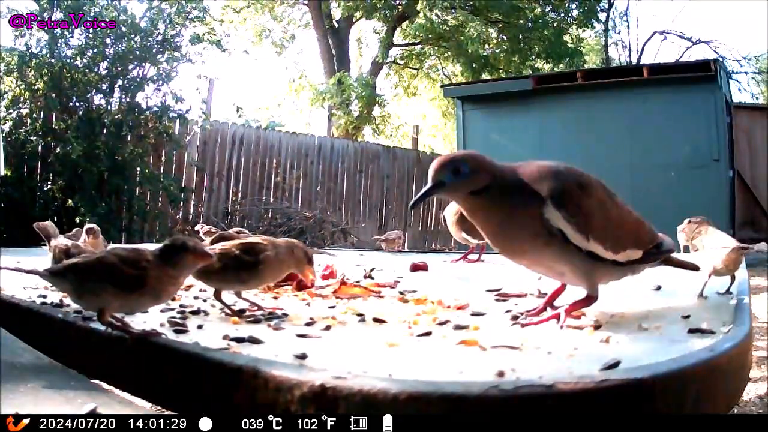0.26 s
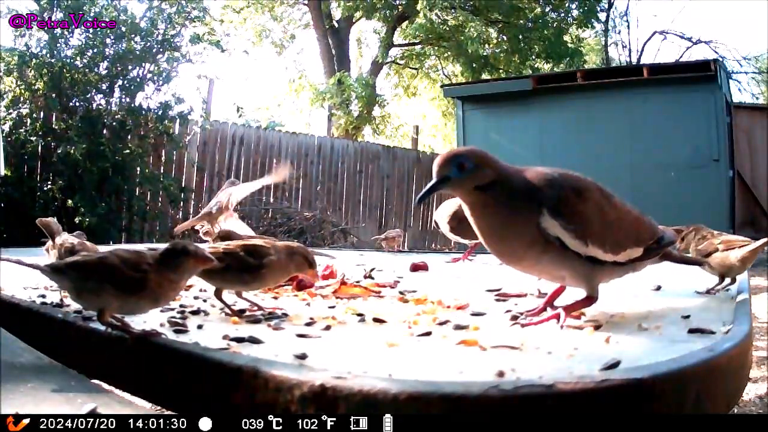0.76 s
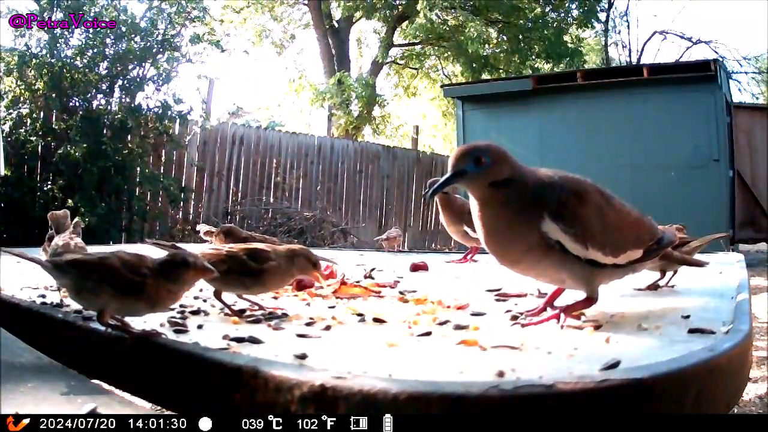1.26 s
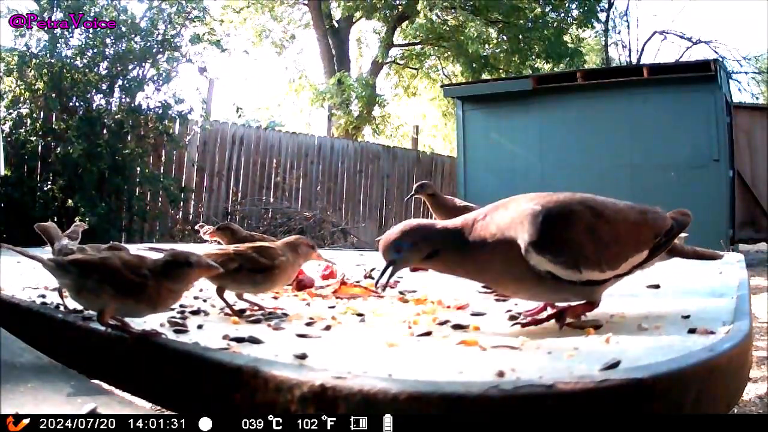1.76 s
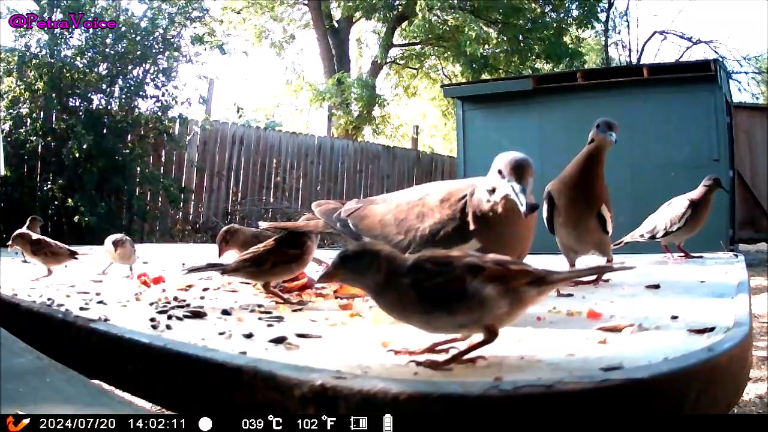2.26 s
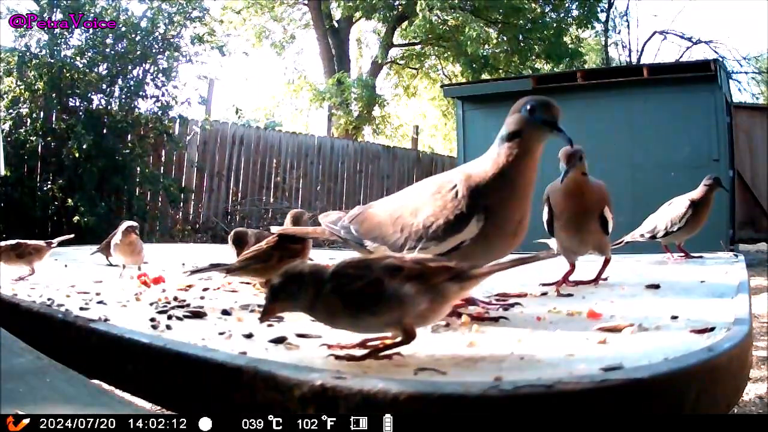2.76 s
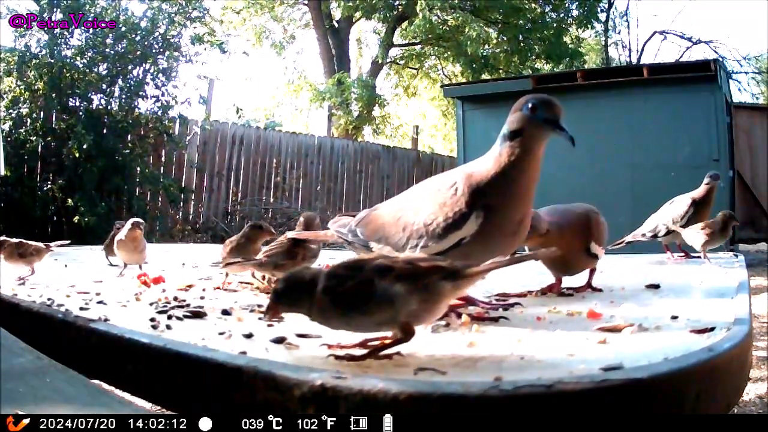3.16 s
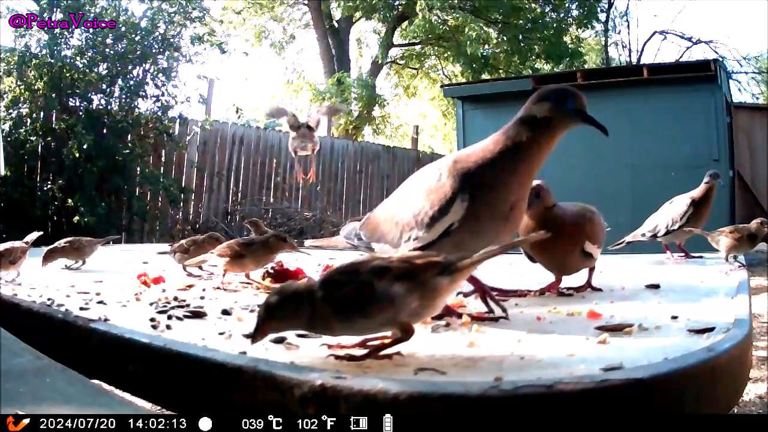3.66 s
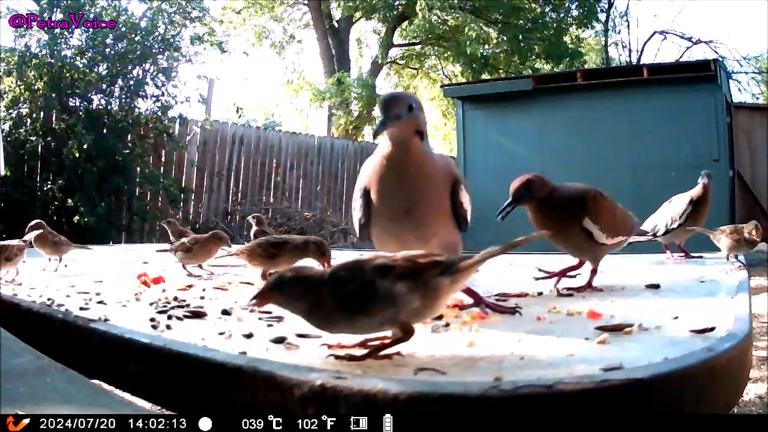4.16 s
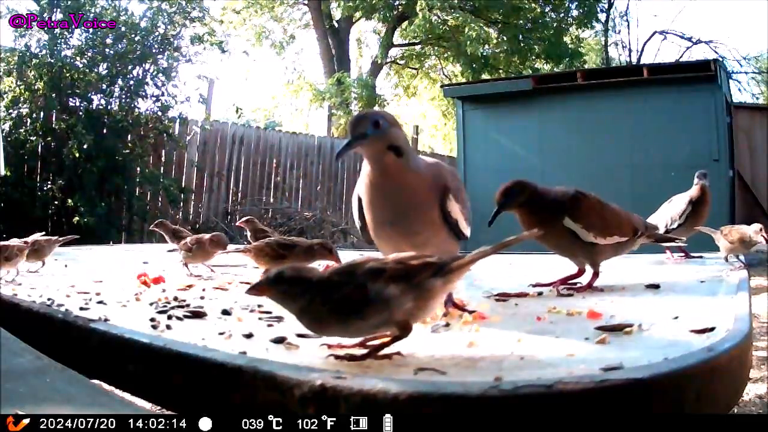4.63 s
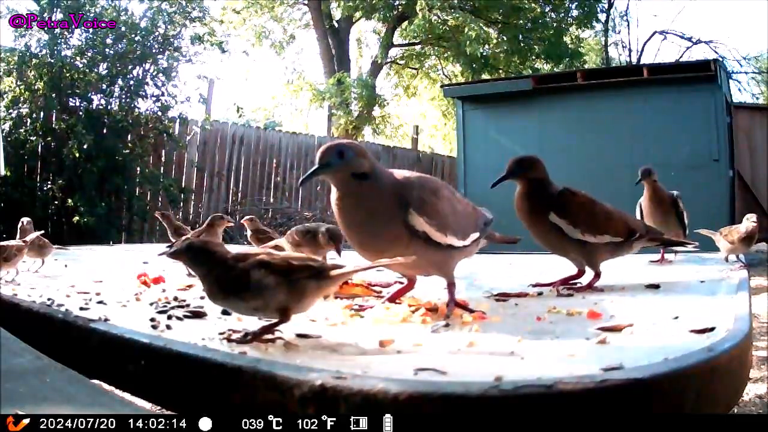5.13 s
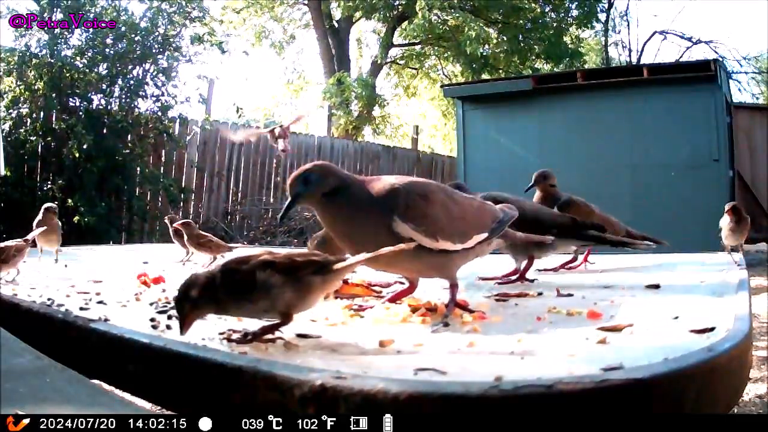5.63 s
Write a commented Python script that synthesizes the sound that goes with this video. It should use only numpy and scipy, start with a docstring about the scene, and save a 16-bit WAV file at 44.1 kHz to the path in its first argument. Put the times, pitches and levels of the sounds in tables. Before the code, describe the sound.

Close to a small outdoor microphone, birds peck seed on a hard tray: a quick cluster of bright clicks first, then scattered taps and two ringing knocks. Midway, a songbird farther off alternates short rising and falling whistles, joined by a brief hoarse chirp. Dry husk snaps follow. Insect buzz, low drone and distant air continue throughout, in thin narrow sound.

```python
"""Sparrows and doves peck seed on a feeder tray close to a small trail camera: noisy blows ring damped modes.
Husks snap as short rings without the tray; raking claws or fluttering wings are runs of tiny blows.
A songbird farther off alternates rising and falling gliding tones; sparrow chirps and a faint high tap
are rough short glides. Behind lie filtered-noise air, insect buzz, drone and traffic, a far motor's orders
and the camera's hum."""
import sys
import numpy as np
from scipy import signal
from scipy.fft import rfft, irfft
from scipy.io import wavfile
from scipy.ndimage import uniform_filter1d

SR = 44100
rng = np.random.default_rng(int(sys.argv[2]) if len(sys.argv) > 2 else 0)


def waveform_to_disk(signal):
    """Save audio, clipped to [-1, 1], as 16-bit WAV at the path in sys.argv[1]."""
    frames = np.transpose(np.atleast_2d(signal))
    scaled = np.clip(frames, -1, 1) * 32767
    samples = np.round(scaled).astype(np.int16)
    wavfile.write(sys.argv[1], SR, samples)


N = 259749
T = np.arange(N) / SR


def amp(db):
    """Decibels to gain."""
    return 10 ** (np.asarray(db) / 20)


def unit(x):
    """Scales to rms 1."""
    return x / np.sqrt(np.mean(x ** 2) + 1e-20)


def peaked(x, size=88):
    """Scales a blow so that its loudest 2 ms (size, in samples) have rms 1."""
    return x / np.sqrt(uniform_filter1d(x ** 2, size).max())


def curve(rows):
    """Interpolates (time, level) rows to every sample."""
    return np.interp(T, *np.transpose(rows))


def add(mix, start_s, sound):
    """Mixes a sound into mix, in place."""
    part = mix[max(round(start_s * SR), 0):][:len(sound)]
    part += sound[:len(part)]


def highpass(x, hz=1900):
    """Thins the bass, which tiny sources hardly radiate."""
    return signal.sosfilt(signal.butter(4, hz, "high", fs=SR, output="sos"), x)


def lowpass(x, hz):
    """Keeps what lies below hz."""
    return signal.sosfilt(signal.butter(4, hz, "low", fs=SR, output="sos"), x)


def noise(spectrum, size=N):
    """Steady noise of rms 1, its spectrum interpolated over log frequency."""
    point_hz, point_db = np.transpose(spectrum)
    f = np.fft.rfftfreq(size, 1 / SR)
    gain = amp(np.interp(np.log(f + 1), np.log(point_hz + 1), point_db))
    return unit(irfft(rfft(rng.standard_normal(size)) * gain, size))


def drift(rate_hz):
    """Random motion of rms 1, slower than about rate_hz."""
    f = np.fft.rfftfreq(N, 1 / SR)
    gain = np.exp(-(f / rate_hz) ** 2) * (f > 0)
    return unit(irfft(rfft(rng.standard_normal(N)) * gain, N))


def ring(modes, t, scatter, tilt_db=0):
    """Decaying modes; each contact point shifts and weights them a little differently."""
    out = np.zeros(len(t))
    for hz, db, t60_s in modes:
        shift, weight_db = rng.standard_normal(2)
        level_db = db + weight_db + tilt_db * np.log2(hz / 3300) - 60 * t / t60_s
        out += amp(level_db) * np.sin(2 * np.pi * hz * (1 + scatter * shift) * t)
    return out


def echoes(x, t60_s, wet_db):
    """Adds sparse random reflections that decay exponentially after the first 6 ms."""
    t = np.arange(SR) / SR
    taps = rng.standard_normal(SR) * (rng.random(SR) < 3000 / SR)
    taps *= amp(-60 * t / t60_s) * (t > .006)
    return x + amp(wet_db) * signal.fftconvolve(x, taps / np.linalg.norm(taps))[:N]


# short ring of every sharp contact at the microphone: nominal_hz, relative_db, t60_s
CLICK_MODES = [(2920, -4.5, 0.0012), (3336, 11.5, 0.0052), (3840, -7, 0.0024), (4370, -11, 0.0032),
               (5330, -10.5, 0.0079), (6450, -5.5, 0.0053)]
# quickly damped tray resonances under the beak: nominal_hz, relative_db, t60_s
CRACK_MODES = [(2360, -11, 0.023), (3247, 2.5, 0.014), (4455, -3.5, 0.0096), (5800, -2.5, .011),
               (7120, -0.5, 0.014)]
# longer tray modes: nominal_hz, relative_db, t60_s
TRAY_MODES = [(1087, -20, .2), (2082, -5, .11), (2232, -10, .1), (2354, -9, .09), (2470, -11, .11),
              (2574, -4, .09), (3010, -5, .09), (3169, -1, .06), (3360, 0, .07), (3466, -3, .06),
              (4453, -9, .05), (4640, -10, .07), (5760, -8, .06), (6650, -13, .07), (7095, -6, .07),
              (7210, -6, .06)]
# the tray's dense small modes together: frequency_hz, relative_db_per_hz
TRAY_WASH = [(500, -56), (1100, -16), (1780, -29.5), (2080, -10.5), (2540, 1.5), (2700, -11.5),
             (2900, -10.5), (3080, 4.5), (3420, 1.5), (3650, -5.5), (3950, -19), (4500, -1), (5100, -13),
             (5750, -5), (6400, -12.5), (7250, 1.5), (7800, -6)]
# early decay of the small modes: frequency_hz, t60_s
TRAY_DECAY = [(1000, 0.32), (2400, 0.3), (3300, 0.041), (4500, 0.09), (7500, 0.034)]
# the blow's return from the tray's rim: delay_s, relative_db
RIM_ECHOES = [(.0066, -6.5), (.0168, -16)]


def peck(tilt_db, ring_db):
    """A beak strikes, cracks and skids for an instant over grit, and sets the tray ringing."""
    t = np.arange(SR // 5) / SR
    skid_s, grit_db, bright_db = .0006, -3, 4
    crack_db, modes_db, wash_db = -2, -15, -9
    late_db, late_t60_s = -17, .36
    rim_hz, rim_tilt_db = 3400, -5

    def strike(modes, slope_db):
        """One impulse and its noisy skid excite a set of modes."""
        grit = rng.standard_normal(len(t)) * t * np.exp(-t / skid_s)
        force = amp(grit_db) * grit / np.linalg.norm(grit)
        add(force, skid_s, np.ones(1))
        rung = signal.fftconvolve(force, ring(modes, t, .005, slope_db))[:len(t)]
        return peaked(highpass(rung, hz=2320))

    # most small modes die early at a rate set by frequency; a weak share lingers
    hz, age_s, wash = signal.stft(noise(TRAY_WASH, size=len(t)), SR, nperseg=128)
    hz = np.maximum(hz, 2000)[:, None]
    early = amp(-60 * age_s / np.interp(hz, *np.transpose(TRAY_DECAY)))
    late = amp(late_db - 60 * age_s / late_t60_s)
    wash = wash * (early + late) * amp(tilt_db * np.log2(hz / 3300))
    wash = signal.istft(wash, SR, nperseg=128)[1][:len(t)]

    # loose seeds rattle
    jostle = amp(3 * unit(uniform_filter1d(rng.standard_normal(len(t)), size=90)) - 1)
    modes = highpass(ring(TRAY_MODES, t, .002, tilt_db), hz=1000)
    # bending waves take a moment to spread over the tray
    spread = 1 - np.exp(-t / .0009)
    body = (amp(modes_db) * modes + amp(wash_db) * wash * jostle) * spread
    body += amp(crack_db) * strike(CRACK_MODES, tilt_db)
    for delay_s, db in RIM_ECHOES:
        returned = lowpass(strike(CRACK_MODES, tilt_db + rim_tilt_db), hz=rim_hz)
        add(body, delay_s, amp(db) * returned)
    return strike(CLICK_MODES, tilt_db + bright_db) + amp(ring_db) * body


# beaks and feet on the tray: start_s, click_level_db, ring_db (tray re click), tilt_db_per_octave
PECKS = [(0.0828, -47.5, -4, -4), (0.1135, -47.5, -13, -2), (0.126, -49.5, -10, -3), (0.13, -51, -5, 4.5),
         (0.146, -49, -10, -6), (0.164, -39, -4, -6), (0.1995, -50, 3, -11), (0.2111, -44.5, -9, -9),
         (0.2282, -44, -14, 3), (0.2485, -53.5, 0.5, -2), (0.2562, -54, -2.5, -5), (0.5812, -50, -5, -8),
         (0.633, -56, -0.5, -5), (0.7204, -53, 1.5, -14), (1.021, -53, 2, 1), (1.07, -54, 0, -5),
         (1.3803, -47.5, 10.5, -1.5), (1.4613, -38.5, 11, 0.5), (1.8298, -50.5, -5, -16),
         (1.9877, -58, 4.5, -18), (2.0515, -55, -2, -2), (2.187, -58, 9, -13), (5.438, -51, -1, -13)]


def pecks():
    """The distinct blows on the tray, each exciting its modes afresh."""
    out = np.zeros(N)
    for start_s, level_db, ring_db, tilt_db in PECKS:
        add(out, start_s, amp(level_db) * peck(tilt_db, ring_db))
    return out


# husks snapping in a beak: start_s, level_db, tilt_db_per_octave
SNAPS = [(0.1052, -51, 19), (0.854, -51, 20), (3.2087, -45.5, -2), (3.54, -44, -4), (3.5871, -38, 2),
         (4.3503, -48.5, 0), (4.3982, -38, 7), (4.546, -46.5, 5), (4.681, -47, 6), (4.818, -45.5, 4),
         (4.8665, -36.5, -0.5), (5.088, -54, 28), (5.7344, -48, 10)]


def snaps():
    """Husks crack in the air: only the short contact ring sounds, the tray stays still."""
    out = np.zeros(N)
    t = np.arange(SR // 50) / SR
    onset = 1 - np.exp(-t / .0002)
    for start_s, level_db, tilt_db in SNAPS:
        crack = ring(CLICK_MODES, t, .015, tilt_db) * onset
        add(out, start_s, amp(level_db) * peaked(highpass(crack, hz=2310)))
    return out


# claws raking seed or wings fluttering: start_s, length_s, level_db
FLURRIES = [(0.092, .05, -58), (0.167, .1, -57.5), (0.589, 0.067, -67), (1.022, 0.075, -64),
            (1.977, 0.12, -65), (3.545, 0.14, -59.5), (4.976, 0.059, -60)]


def flurries(grains_per_s=350, tilt_db=-7, ring_db=4, variants=4):
    """Claws raking seed or wings fluttering: a quick run of tiny blows in several variants."""
    out = np.zeros(N)
    for start_s, length_s, level_db in FLURRIES:
        n = round(length_s * SR)
        struck = rng.random((variants, n)) < grains_per_s / variants / SR
        blows = rng.standard_normal((variants, n)) * struck
        rattle = sum(signal.fftconvolve(train, peck(tilt_db, ring_db))[:n] for train in blows)
        add(out, start_s, amp(level_db) * unit(rattle) * signal.windows.tukey(n, .4))
    return out


def shuffling(count=40, mean_db=-60, spread_db=1.5, mean_tilt_db=-5):
    """Faint claws and nudged seeds from the whole flock: weak blows at random times."""
    out = np.zeros(N)
    starts_s = rng.uniform(0, N / SR, count)
    for start_s, size in zip(starts_s, rng.standard_normal(count)):
        tilt_db = np.clip(mean_tilt_db + 4 * rng.standard_normal(), -9, 4)
        level_db = mean_db + spread_db * min(size, 2)
        add(out, start_s, amp(level_db) * peck(tilt_db, ring_db=-1.5))
    return out


def glide_tone(hz, level_db, rough=0, taper=.17):
    """A soft-ended tone follows a pitch glide; roughness is a fast jitter of its pitch."""
    waver = .008 * drift(40)[:len(hz)]
    flutter_db = 2.2 * drift(70)[:len(hz)]
    jitter = rough * drift(350)[:len(hz)]
    turns = np.cumsum(hz * (1 + waver + jitter)) / SR
    tone = np.sqrt(2) * np.sin(2 * np.pi * turns)
    return amp(level_db + flutter_db) * tone * signal.windows.tukey(len(hz), taper)


# rising whistles before the paths: start_s, level_db, pitch_factor
RISES = [(2.533, -55, 1.006), (2.805, -51.5, 0.99), (3.071, -51.5, 1.02), (3.338, -50, 1.02),
         (3.604, -55.5, 1.02), (3.893, -48, 1.02), (4.15, -53, 1.005)]
# falling whistles before the paths: start_s, length_s, level_db, pitch_factor
FALLS = [(2.675, 0.05, -59.5, 0.99), (2.939, 0.05, -55.5, 1.02), (3.207, 0.064, -52, 1.005),
         (3.477, 0.047, -51.5, 1), (3.757, .058, -52.5, .985), (4.019, 0.048, -53, 1.06)]
# paths from the songbird, screened by leaves: delay_s (re strongest), gain_db, scattered_power_share
PATHS = [(-.045, -11, .35), (0, -2.4, .09), (.024, -12, .6)]


def songbird():
    """Alternates two gliding whistles, which arrive by several paths blurred by leaves."""
    song, out = np.zeros(N), np.zeros(N)
    # pitches before each whistle's factor; slide and top are shares of its length
    rise_s, rise_from_hz, rise_to_hz, slide = .08, 2740, 3310, .8
    fall_top_hz, fall_end_hz, top_at = 2280, 1810, .28
    rise_fade_db, fall_fade_db, leaves_t60_s = -6, -4.5, .08

    # slide up, then hold and fade
    u = np.linspace(0, 1, round(rise_s * SR))
    glide = np.sin(np.pi / 2 * np.minimum(u / slide, 1)) ** 2
    hz = rise_from_hz + (rise_to_hz - rise_from_hz) * glide
    fade_db = rise_fade_db * np.maximum(u - slide, 0) / (1 - slide)
    for start_s, level_db, pitch in RISES:
        add(song, start_s, glide_tone(pitch * hz, level_db + fade_db, rough=.01))

    # arch over the top, then drop and fade
    for start_s, length_s, level_db, pitch in FALLS:
        u = np.linspace(0, 1, round(length_s * SR))
        arch = np.sin(np.pi / 2 * (u - top_at) / (1 - top_at)) ** 2
        hz = fall_top_hz + (fall_end_hz - fall_top_hz) * arch
        add(song, start_s, glide_tone(pitch * hz, level_db + fall_fade_db * u ** 2, rough=.008))

    for delay_s, gain_db, share in PATHS:
        wet_db = 10 * np.log10(share / (1 - share))
        blurred = np.sqrt(1 - share) * echoes(song, leaves_t60_s, wet_db)
        out += amp(gain_db) * np.roll(blurred, round(delay_s * SR))
    return out


# sparrow calls, and at 4.975 s a faint high tap, before echoes:
# start_s, length_s, first_hz, last_hz, level_db
CHIRPS_AND_TAP = [(2.015, 0.052, 3300, 3630, -61.5), (3.591, 0.057, 3020, 3080, -54),
                  (3.651, 0.039, 3520, 3403, -51.5), (3.684, .04, 3880, 3640, -60.5),
                  (4.975, 0.021, 4500, 4400, -63)]


def chirps_and_tap():
    """Short hoarse sparrow calls and, last, a faint high tap: straight glides with strong pitch jitter."""
    out = np.zeros(N)
    for start_s, length_s, first_hz, last_hz, level_db in CHIRPS_AND_TAP:
        hz = np.linspace(first_hz, last_hz, round(length_s * SR))
        add(out, start_s, glide_tone(hz, level_db, rough=.035, taper=.8))
    return out


# drone level: time_s, level_db
DRONE_LEVEL = [(0, -57), (.7, -56.5), (1.25, -57.5), (1.7, -62.5), (2.5, -57.5), (3.4, -53.5), (4.15, -56),
               (4.7, -58.5), (5.9, -61.5)]


def drone(hz=395, width_hz=21, skirt_hz=420, skirt_width_hz=75, skirt_db=-4):
    """A fuzzy steady note: noise in a narrow band with a wider shoulder above it."""
    def band(centre_hz, band_hz):
        """Band-passed noise of rms 1."""
        edges_hz = [centre_hz - band_hz / 2, centre_hz + band_hz / 2]
        sos = signal.butter(2, edges_hz, "band", fs=SR, output="sos")
        return unit(signal.sosfilt(sos, rng.standard_normal(N)))

    note = band(hz, width_hz) + amp(skirt_db) * band(skirt_hz, skirt_width_hz)
    return amp(curve(DRONE_LEVEL)) * unit(note)


# insect spectrum: frequency_hz, relative_db_per_hz
BUZZ_SPECTRUM = [(1500, -59.5), (2200, -35.5), (2500, 2), (2800, -1), (3250, 2.5), (3700, -4.5),
                 (4300, -10), (5200, -11), (6200, -11), (6800, -6), (7500, -14)]
# insect level before flicker: time_s, level_db
BUZZ_LEVEL = [(0, -59), (1.7, -58.5), (2.4, -61.5), (5.9, -63.5)]


def insects(flicker_db=2.0):
    """Insects in the trees: shaped noise whose level flickers fast."""
    return amp(curve(BUZZ_LEVEL) + flicker_db * drift(31)) * noise(BUZZ_SPECTRUM)


def tones(hz, orders, flutter_db):
    """Multiples of one rate, each wavering in strength."""
    turns = np.cumsum(hz) / SR
    out = np.zeros(N)
    for multiple, db in orders:
        gain = amp(db + flutter_db * drift(3.0))
        out += gain * np.sin(2 * np.pi * (round(multiple) * turns + rng.random()))
    return np.sqrt(2) * out


# camera hum: frame_rate_multiple, mean_level_db
HUM_ORDERS = [(1, -63.5), (2, -60.5), (3, -72), (6, -64.5)]


def camera_hum(frame_hz=24.98):
    """The camera hums at multiples of its frame rate."""
    return tones(np.full(N, frame_hz), HUM_ORDERS, flutter_db=2.1)


# motor orders: rate_multiple, relative_db
MOTOR_ORDERS = [(1, -4), (2, -3.5), (3, 0)]


def motor(waver=.011):
    """A far motor swells to a peak, then fades; its wavering pitch sags throughout."""
    start_hz, sag_hz_per_s = 112.35, 1.3
    peak_s, peak_gain_db, swell_db_per_s, fade_db_per_s = .32, -56.5, 23, 7.5
    slope_db = np.minimum(swell_db_per_s * (T - peak_s), fade_db_per_s * (peak_s - T))
    hz = (start_hz - sag_hz_per_s * T) * (1 + waver * drift(3.4))
    return amp(peak_gain_db + slope_db) * tones(hz, MOTOR_ORDERS, flutter_db=2.0)


# swells of distant traffic: peak_s, half_length_s, centre_hz, peak_level_db
TRAFFIC = [(0.41, 1.5, 304, -62.5), (2.32, 0.035, 296.4, -58.5), (3.128, 0.098, 187.6, -60),
           (3.862, 0.31, 184.1, -60.5)]


def traffic(width_hz=11):
    """Narrow noise bands, made by slow drift on two quadrature carriers, swell and fade."""
    out = np.zeros(N)
    for peak_s, half_length_s, centre_hz, level_db in TRAFFIC:
        phase = 2 * np.pi * centre_hz * T
        band = drift(width_hz) * np.cos(phase) + drift(width_hz) * np.sin(phase)
        out += amp(level_db) * band / np.cosh((T - peak_s) / half_length_s)
    return out


# distant town and air: frequency_hz, relative_db_per_hz
AIR_SPECTRUM = [(5, 0.5), (18, 10), (33, 3.5), (70, -3), (130, -8.5), (260, -12.5), (440, -17), (600, -22),
                (800, -22), (1100, -20), (1450, -21), (1580, -25.5), (3000, -29), (7500, -36.5)]
# air level: time_s, level_db
AIR_LEVEL = [(0, -46), (2.2, -46.5), (4.5, -45.5), (5.9, -46.5)]


def distant_air():
    """Distant town and air: shaped noise with a slowly changing level."""
    return amp(curve(AIR_LEVEL)) * noise(AIR_SPECTRUM)


def scene():
    """The near flock, the far singer and the background; fence, shed and trees echo the first two."""
    yard_t60_s = .42
    flock = echoes(pecks() + snaps() + flurries() + shuffling(), yard_t60_s, wet_db=-26.5)
    song = echoes(songbird() + chirps_and_tap(), yard_t60_s, wet_db=-5.5)
    background = drone() + insects() + camera_hum() + motor() + traffic() + distant_air()
    return (flock + song + background)[None]


def record(dry, offset=-.016, edge_hz=7680):
    """The camera's narrow band and the steady offset of its converter."""
    taps = signal.firwin(151, edge_hz, window=("kaiser", 7), fs=SR)
    return signal.oaconvolve(dry, taps[None], "same") + offset


dry = scene()
out = record(dry)
waveform_to_disk(out)
```